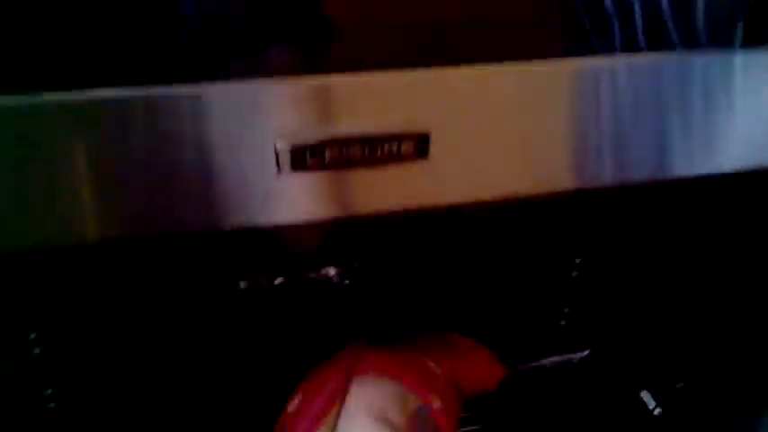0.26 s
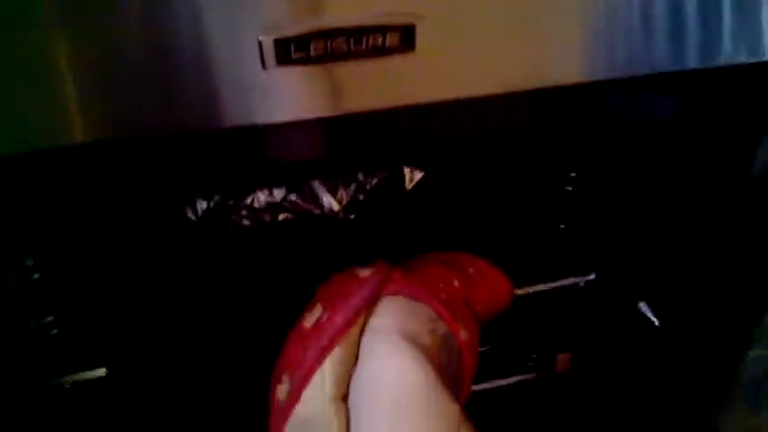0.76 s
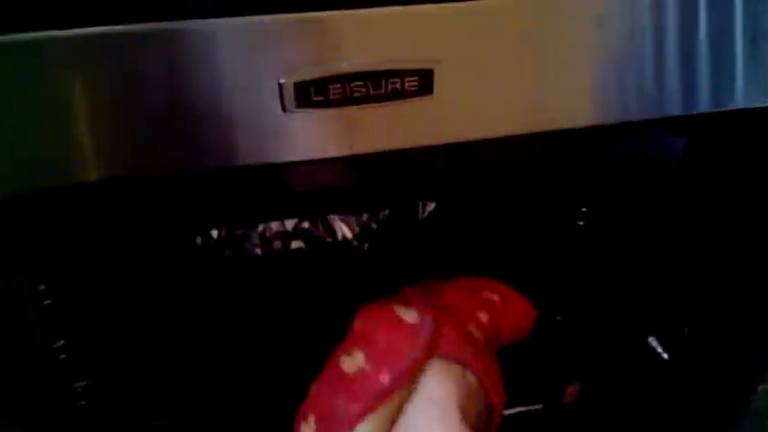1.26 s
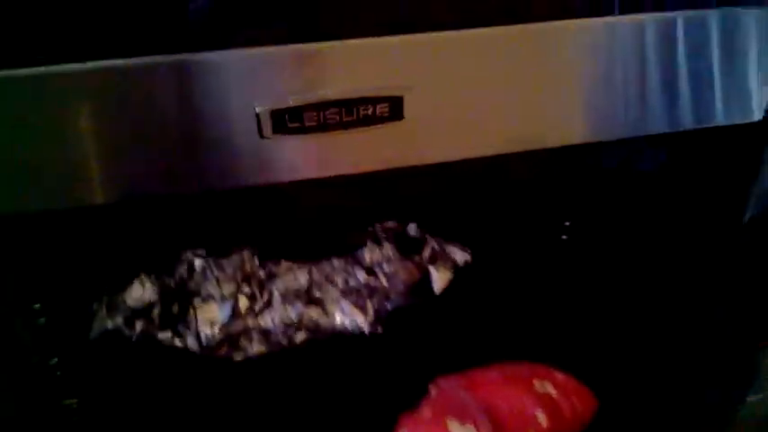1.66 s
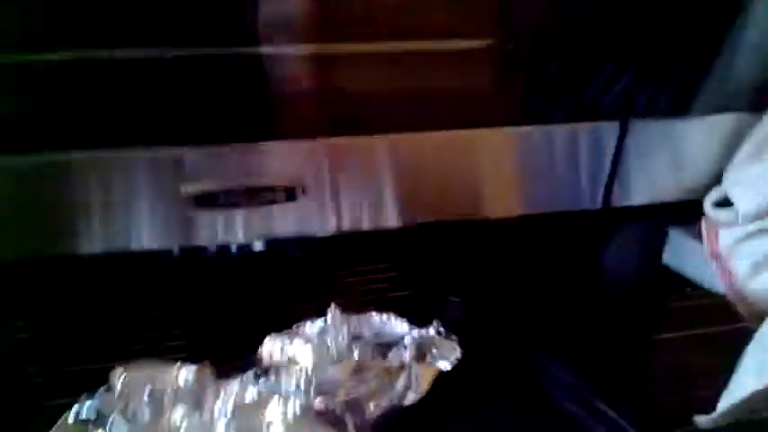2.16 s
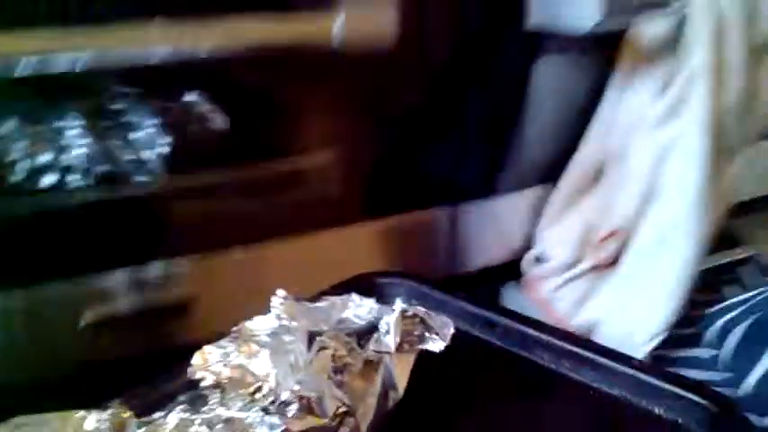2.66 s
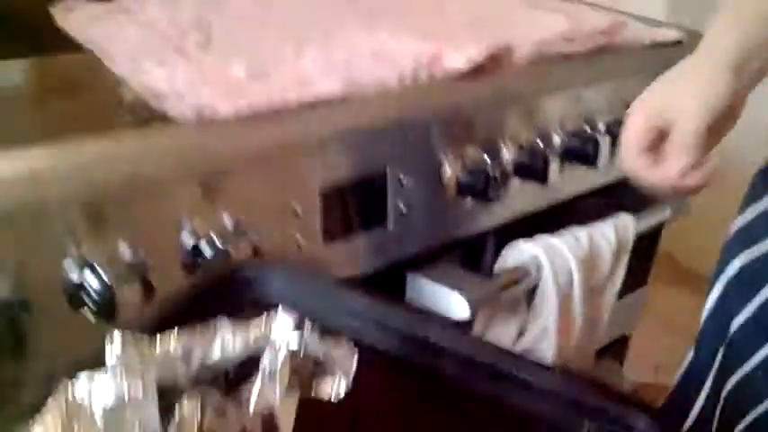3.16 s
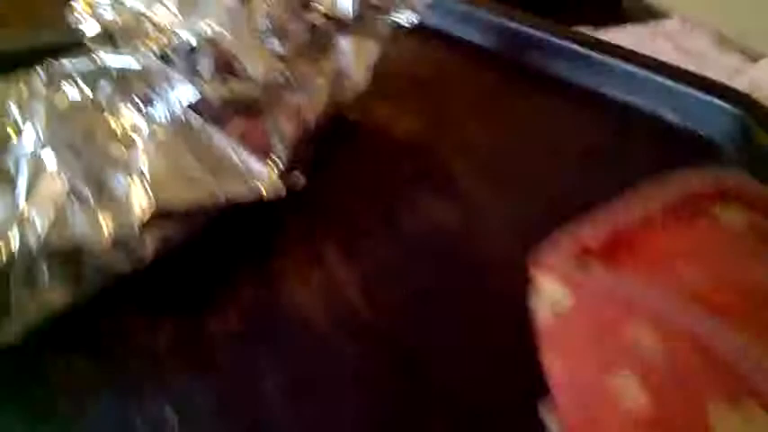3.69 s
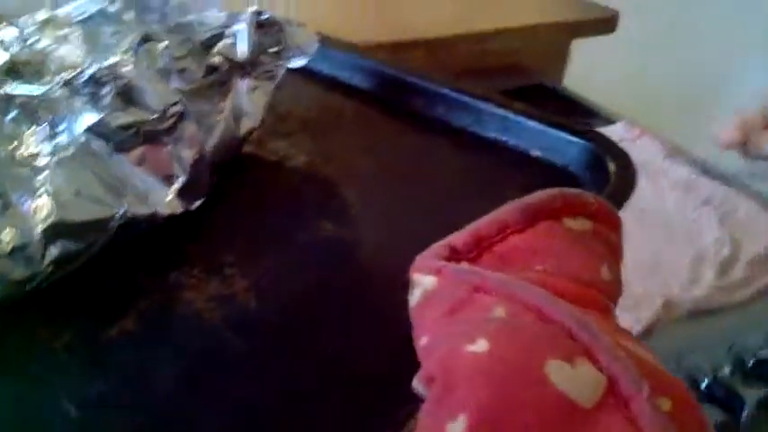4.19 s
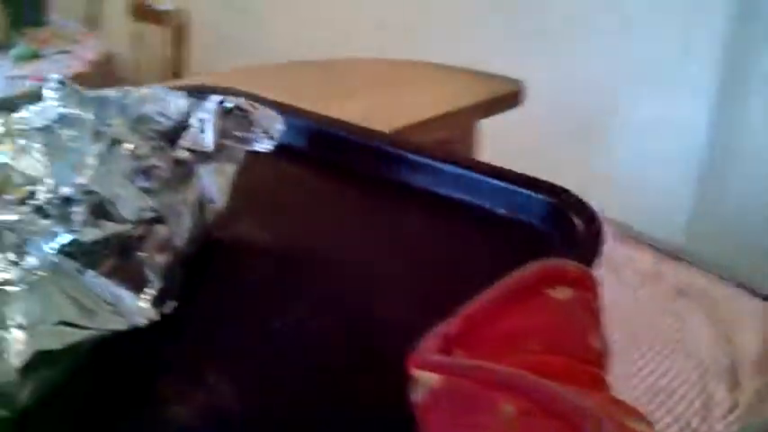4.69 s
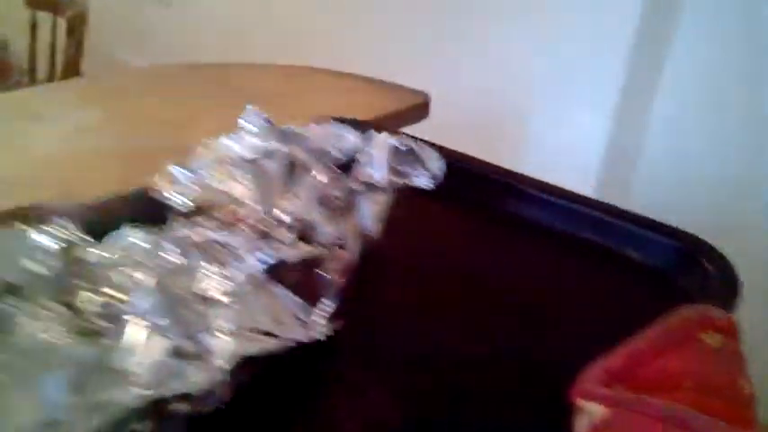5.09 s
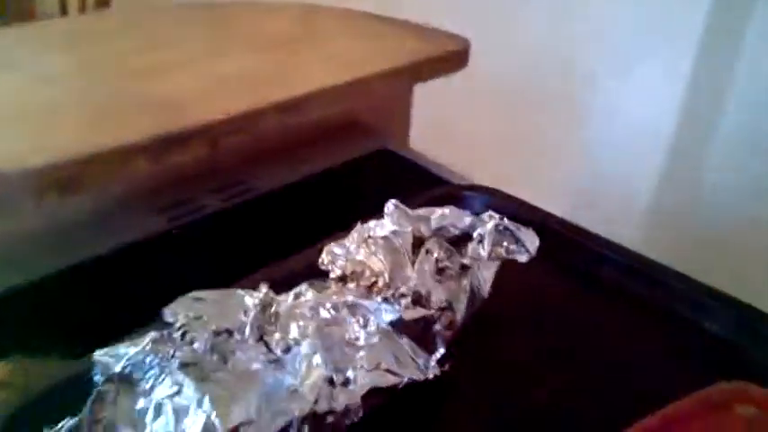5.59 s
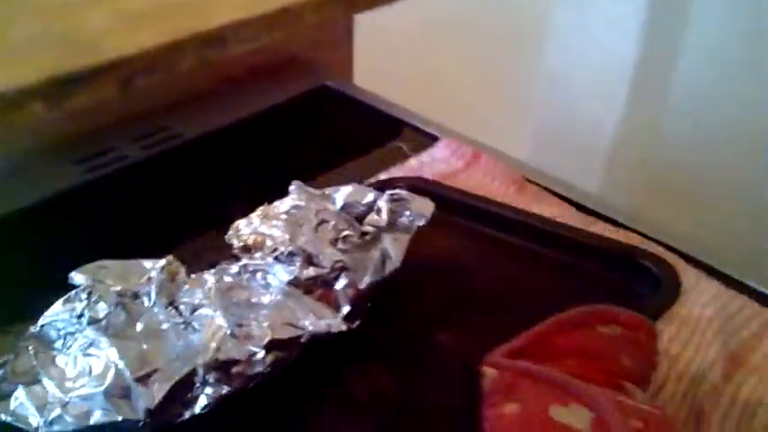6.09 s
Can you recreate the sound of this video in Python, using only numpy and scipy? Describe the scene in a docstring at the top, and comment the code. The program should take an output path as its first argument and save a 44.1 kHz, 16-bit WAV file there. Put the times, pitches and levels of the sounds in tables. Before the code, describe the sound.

A tray grates and knocks against oven metal, growing from light touches to a cluster of hard, ringing clanks with a hollow, boomy body. Crumpled foil then crackles faintly as the tray is carried, with damped knocks and crisp clicks. A heavy oven door bangs shut with a quick bouncing rattle, the loudest event. Quiet brushes and handling bumps remain. Dry, close phone microphone with low grip rumble and steady hiss.

```python
"""In a kitchen, a gloved hand drags a steel baking tray with crumpled foil off an oven rack: knocks, jerky scrapes.
Off the rack the tray's clear ringing is damped; foil rustles as it is carried, and a panel booms when shaken.
Knobs click, the oven door slams and bounces, and finger bumps follow; steady air, hiss and grip rumble lie beneath.
Blows and rubs are noise grains coloured in bands and fed to steel modes; clicks and singing steel are sines.
One channel, a phone held in the hand: no distance or room reverberation is added, only short echoes on the clicks,
soft overload and a band limit."""
import sys
import numpy as np
from scipy import signal
from scipy.fft import rfft, irfft, next_fast_len
from scipy.io import wavfile
from scipy.ndimage import uniform_filter1d

SR = 44100
rng = np.random.default_rng(int(sys.argv[2]) if len(sys.argv) > 2 else 0)


def to_wav(s):
    """Save 16-bit WAV."""
    ch = np.atleast_2d(s).T  # columns
    pcm = np.round(np.clip(ch, -1, 1) * 32767)  # PCM
    wavfile.write(sys.argv[1], SR, pcm.astype(np.int16))


N = 279933  # length in samples

# Levels in the tables stand before the mix gains and the overload.
# Room air and microphone hiss. Each row: frequency in Hz, relative spectral level in dB.
ROOM_TONE = [(15, -39), (28, -34), (60, -13), (110, -6), (250, -12.5), (400, -8.5), (700, -18), (1100, -17),
             (1700, -12.5), (2250, -17.5), (2950, -17), (4000, -23), (6200, -19.5), (7500, -27),
             (16000, -32)]
ROOM_DB = -57.5  # rms, before its slight swell
# The hand shifts on the phone. Each row: start in seconds, rise in seconds, length in seconds,
# level in dB, fade in dB, upper rumble against the deep one in dB.
GRIP_SHIFTS = [(.2, 0.27, 0.26, -62, -8, 15), (.5, .15, 0.35, -66, -11, 10),
               (1.025, 0.055, .19, -55, 0, 14), (1.25, 0.32, 0.4, -59, -8, 15),
               (1.55, .34, 0.47, -62, -12, -9), (2.2, 0.15, 0.27, -64, -9, -11),
               (2.4, .2, 0.42, -59, -14, -20), (3.36, .1, 0.2, -42.5, -35, -18),
               (3.62, .02, .14, -62, -20, -15), (3.777, .04, 0.22, -53, -15, 6),
               (4.1, 0.14, 0.3, -53.5, -11, -8), (4.325, 0.237, .31, -42, -23, -4),
               (4.685, .03, 0.2, -30.5, -5.5, -4.5), (4.924, 0.042, 0.24, -36.5, -28, -3),
               (5.175, 0.11, .32, -39, -28, -19), (5.525, 0.3, 0.3, -45, -12, -19)]
GRIP_REST_DB = -72.5  # the hand is never quite still
# Finger bumps on the phone. Each row: start in seconds, peak in dB before a small trim, time scale in seconds.
FINGER_BUMPS = [(5.267, -35, 0.04), (5.631, -45, 0.012), (5.698, -41, 0.0097), (5.739, -37, 0.02),
                (5.806, -38, 0.0095)]
# Small sprung clicks, as of a knob. Each row: start in seconds, peak in dB, pitch in Hz, number of cycles.
KNOB_CLICKS = [(1.6295, -18.5, 2870, 7.6), (1.698, -17, 3040, 4.6), (2.1247, -29.5, 5400, 7.3),
               (3.3957, -25, 3020, 6.6), (3.398, -19, 3100, 4.8), (3.484, -10.5, 3300, 7.2),
               (3.49, -41, 3060, 3.3), (3.548, -25, 3280, 4.7), (3.568, -37, 4800, 4),
               (3.7848, -31.5, 3320, 9.7), (4.101, -36.5, 3100, 4.6), (4.117, -45, 3310, 5.0),
               (4.136, -41, 2990, 4.4), (4.365, -23, 3600, 1.6), (4.3704, -29, 3300, 5.2),
               (4.3831, -9, 3200, 3.8), (4.441, -19, 3500, 3.4), (5.302, -29.5, 3300, 4.1)]
# A small stiff metal part rings briefly around some of the clicks. Each row: start in seconds, rise in seconds,
# length in seconds, level in dB, fade in dB.
JINGLE_MOVES = [(1.626, .003, .03, -32.5, -12), (3.39, .004, 0.026, -32, -14),
                (3.527, .01, 0.034, -48.5, -3), (4.382, .002, 0.091, -28.5, -22)]
# Its modes. Each row: frequency in Hz, relative level in dB, waver in Hz.
JINGLE_PITCHES = [(2960, 3, 44), (3070, 1, 29.2), (3335, -3, 52), (3580, -3, 58.7), (4470, -8, 59)]
# A large steel panel booms when shaken. Each row: start in seconds, rise in seconds, length in seconds,
# level in dB, fade in dB, pitch in Hz.
PANEL_BOOMS = [(.25, 0.1, .19, -33.5, -12, 102), (0.462, 0.082, 0.35, -46.5, -9, 100),
               (0.842, 0.035, .1, -48, -10, 76), (.97, 0.034, 0.06, -32, -5, 80.7),
               (1.035, 0.023, 0.066, -22.5, -15, 91.4), (1.093, 0.045, 0.19, -30.5, -2.5, 105),
               (1.296, 0.04, 0.086, -30, -15, 107), (1.42, 0.1, 0.21, -31, -20, 112),
               (1.686, 0.063, 0.28, -33, -8, 100), (2.014, 0.17, 0.31, -47.5, -13, 102.5),
               (2.428, .012, 0.067, -49, -2, 265), (2.502, 0.071, 0.15, -37, -26, 103.5),
               (2.68, .08, .2, -53.5, -13, 103), (2.9, .09, .27, -54, -16, 101),
               (3.772, 0.071, 0.23, -40, -24, 78), (4.365, 0.033, 0.27, -36.5, -18, 132),
               (5.163, 0.033, 0.61, -48, -15.5, 109), (5.82, .13, 0.28, -60, -11, 108)]
# The oven hollow. Each row: frequency in Hz, relative level in dB, waver in Hz.
HOLLOW_PITCHES = [(482, 0.5, 14.4), (510.5, 2.5, 15), (531.4, -0.5, 11.3)]
# Thin steel sings, first under the tray, later after jolts. Each row: start in seconds,
# rise in seconds, length in seconds, level in dB, fade in dB.
THIN_STEEL_MOVES = [(0.0, 0.0035, 0.066, -42.5, -23), (.162, 0.0091, 0.089, -45, 1),
                    (0.296, 0.019, 0.054, -25, -37), (.42, 0.038, 0.061, -45, -23),
                    (.52, 0.054, .21, -48, -16), (3.56, 0.0078, 0.11, -55, 2), (3.84, .005, 0.11, -57.5, 5)]
# Its modes. Each row: frequency in Hz, relative level in dB, waver in Hz.
THIN_STEEL_PITCHES = [(1527, 0, 31), (1620, -1, 25.8), (1630, 4.5, 24), (1710, -14, 78)]
# Fine grit of bare metal on metal. Each row: start in seconds, rise in seconds, length in seconds,
# level in dB, fade in dB.
GRIT_MOVES = [(.94, .06, .1, -57, -14), (1.036, .028, 0.13, -47, -39), (1.395, 0.12, 0.22, -53, -25),
              (2.46, .07, 0.18, -68, -5), (3.37, .042, .14, -68, -8), (4.36, .042, .13, -60, -19)]
# The foil rustles faintly while carried. Each row: time in seconds, level in dB.
FOIL_RUSTLE = [(1.899, -78), (2.2, -58.5), (2.65, -51), (2.85, -53), (3.12, -53.5), (3.2, -57.5),
               (3.75, -61), (4.0, -55), (4.1, -61), (4.26, -64), (5.35, -65), (5.45, -68), (5.55, -64),
               (5.7, -64.5), (5.92, -63.5), (6.12, -64), (6.35, -66)]
RUSTLE_TREBLE_DB, RUSTLE_BODY_DB = -2, -10.5  # treble per octave above 1500 Hz, body per octave below 900 Hz
# Off the rack, tray and foil shift and brush; at 4.708 s the door slam rattles loose steel.
# Each row: start in seconds, rise in seconds, length in seconds, level in dB, fade in dB,
# treble lean in dB per octave, body lean in dB per octave
# (the body value also sets, in dB, how strongly the tray modes are stirred).
SHUFFLES_AND_RATTLE = [(1.978, .006, 0.16, -47, -13.5, -5.5, -3), (2.123, 0.015, 0.077, -49, -6, -2, -12),
                       (2.32, 0.096, 0.15, -40, -2.5, -5.5, -13), (2.48, 0.036, 0.15, -39.5, -10.5, 0.5, 1),
                       (2.688, 0.11, 0.094, -46, -8, -11, -8), (3.209, 0.079, 0.18, -50, -9, 3, -2),
                       (3.373, 0.02, .025, -43.5, -5, 9, -19), (3.392, 0.011, 0.16, -35, -5, -4.5, -7.5),
                       (3.58, 0.071, 0.088, -51, -8, -2, 4.5), (3.789, 0.017, 0.17, -40.5, -17, -10, 4.5),
                       (4.283, 0.02, 0.15, -54.5, -9, 2, 2), (4.37, 0.034, .25, -41.5, -16, 2, 7),
                       (4.652, 0.0084, 0.042, -51, -10, 1, -24),
                       (4.708, 0.039, 0.31, -15.5, -25, -4.5, -4.5),
                       (5.033, 0.028, 0.14, -45, 2, -3.5, 1.5), (5.187, 0.041, 0.12, -48, -1.5, 1, 8),
                       (5.31, 0.011, 0.21, -45, -12, -6, 0)]
# The tray slides on the rack in jerks. Each row: as for the shuffles, then level of the oven hollow
# against the scrape in dB.
RACK_SCRAPES = [(0.0, 0.0024, 0.11, -48.5, -7, -7, -15, -28), (0.138, 0.029, 0.082, -52.5, 3, -6.5, 2, 3),
                (0.231, 0.027, 0.064, -32.5, -5.5, -14.5, 0, 2),
                (0.301, 0.0092, 0.12, -28, -15.5, -8, 3, -0.5),
                (0.416, 0.0084, 0.15, -43, -10.5, -5.5, 6, 3), (0.561, 0.063, .15, -45.5, -8, -9.5, -1, -6),
                (0.832, .01, 0.1, -53.5, 5.5, -5, 0, -6), (0.924, 0.072, 0.11, -29.5, -3, -5.5, -11, -7),
                (1.038, 0.012, 0.04, -16, -7.5, -7, -4, -14.5),
                (1.081, 0.0049, 0.21, -27.5, -9, -10, 1, -9.5),
                (1.302, 0.023, 0.062, -29, -1, -7.5, -9, -5), (1.38, .01, 0.034, -35, 10, -5.5, 2, 1.5),
                (1.394, 0.076, .11, -25, -4, -6, -3, -6.5),
                (1.498, .011, 0.13, -26.5, -13.5, -2.5, -3, -3.5),
                (1.62, .004, 0.076, -30, -7, -6, -0.5, -24),
                (1.69, 0.0027, 0.036, -29.5, -2.5, -5.5, -8, -4.5),
                (1.71, 0.05, 0.21, -35, -17, -4.5, 0, -8.5)]
# Colour of the rubbing. Each row: frequency in Hz, relative spectral level in dB.
FRICTION_TONE = [(60, -16), (150, -13.5), (400, -1.5), (700, -3), (1050, -4.5), (1550, 3), (1900, -1),
                 (2250, -6.5), (3000, -1.5), (3800, -6), (5300, -6), (6500, -14), (7500, -23.5),
                 (12000, -61)]
# The door hits its frame and bounces. Each row: start in seconds, peak in dB, treble lean in dB per octave,
# bass lean in dB per octave (both before a common offset), t60 in seconds before the band factor,
# rise in seconds before bass slowing, drive of the clear modes in dB, crack share as an amplitude factor.
DOOR_BLOWS = [(4.697, -5.5, -7.5, -27, 0.088, 0.0044, -16, 0.38),
              (4.709, -14.5, 2.5, -9.5, 0.93, 0.0012, -14, 0.3),
              (4.723, -12.5, 0, -9.5, 0.37, 0.0027, -4.5, 0.3),
              (4.756, -12.5, -14, -10, 0.47, 0.003, -11, 0.3), (4.809, -22, -3, -7, 0.39, 0.0031, -15, 0.3),
              (4.917, -35, -23, -14, 0.74, 0.003, -31, 0.3)]
# Dense ringing of the door. Each row: frequency in Hz, relative spectral level in dB.
DOOR_WASH = [(18, -38), (30, -53), (75, 0.5), (106, 1), (210, -5), (295, -2), (721, -13.5), (822, -15),
             (889, -14), (3060, -11.5), (5740, -18.5), (8080, -28.5), (9710, -26), (16000, -46)]
# Clear modes of the door. Each row: frequency in Hz, gain in dB, t60 in seconds.
DOOR_MODES = [(298.4, 6.5, 0.24), (666, -20, 0.9), (766, -1, 0.43), (863, -5, 0.52), (1020, -20, 0.35),
              (1244, 1, 0.25), (1480, -21, 0.46), (1525, -32, 0.64), (2100, -12, 0.39)]
# The tray knocks against rack and hob. Each row: the columns of the door blows.
TRAY_KNOCKS = [(0.0, -26.5, -25, -31, 0.086, 0.0013, -15, 0.3),
               (0.166, -36.5, -14, 0.5, 0.36, 0.0037, 2.5, 0.88),
               (0.238, -26, -44, -14, 0.27, 0.003, 3, 0.12), (0.309, -24, -14, -6, 0.61, 0.0013, -3, 0.65),
               (0.621, -37, -5.5, -4.5, 0.31, 0.003, -18, 0.6),
               (0.843, -39, -13, -2, 0.67, 0.0075, 2.5, 0.69),
               (0.975, -21, -3, -5, 0.31, 0.0058, 2.5, 0.67), (1.046, -15.5, 2.5, -9, 0.57, 0.0025, 8, 0.5),
               (1.313, -18.5, -11, -9.5, 0.3, 0.0013, -14, 0.54),
               (1.398, -12.5, -28, -12, 0.31, 0.0028, -5, 0.28),
               (1.436, -13, -22, -19, 0.33, 0.0046, -14, 0.23),
               (1.506, -10, -46, -18, 0.47, 0.0014, -14, 0.22),
               (1.63, -22.5, -27, -14.5, 1, 0.0048, -25, 0.44),
               (1.697, -21.5, -20, -13, 0.62, 0.0011, -10, 0.99),
               (1.974, -32, -37, -14, 0.3, 0.0023, 0, 0.37), (2.124, -61, 10, -7, 0.15, 0.002, 2, 0.56),
               (2.325, -38, 0.5, -25, 0.67, 0.005, 6, 1), (2.429, -28, -31, -14.5, 0.24, 0.0083, -8, 0.46),
               (2.502, -33.5, 6, -13.5, 0.26, 0.0052, -14, 0.37),
               (2.896, -41, -4, -38, 0.89, 0.0031, -12, 0.67),
               (3.046, -38, 0.5, -21, 0.32, 0.0033, 5, 0.63), (3.397, -20, -3, -23, 0.31, 0.0049, -5, 0.82),
               (3.438, -21, -7, -19.5, 0.24, 0.0026, -12, 0.95),
               (3.785, -25, -18, -12.5, 0.38, 0.0048, -2, 1),
               (4.292, -53, 10, -20, 0.25, 0.0036, -5.0, 0.54),
               (4.384, -38.5, 11, 2, 0.28, 0.0014, -5.0, 0.56),
               (4.659, -53.5, 9, -14, 0.19, 0.0025, -5.0, 0.7),
               (5.299, -31, -35, -6, 0.29, 0.001, -8, 0.32)]
# Dense ringing of the sheet. Each row: frequency in Hz, relative spectral level in dB.
TRAY_WASH = [(76, -1), (130, 3), (172, 6.5), (224, 0), (268, 4.5), (335, -9.5), (501, -2), (651, -11.5),
             (1580, -7), (2180, -8), (2950, -8), (4410, -21), (5180, -16.5), (16000, -60)]
# Clear modes of the tray. Each row: frequency in Hz, gain in dB, t60 in seconds.
TRAY_MODES = [(171.6, -4, 0.34), (272, -11, 0.46), (406, -7.5, .3), (585, -22, 0.42), (960, -2.5, 0.12),
              (1146, -5, 0.11), (1223, -10, 0.39), (1480, -43, 0.13), (1514, -26, 0.23), (1630, -3.5, 0.2),
              (1774, -13.5, 0.39), (2670, -31, 0.18), (3210, -26, 0.18)]
LIFTED_S, MUFFLE_DB = 1.95, -16.5  # off the rack, the glove damps the clear modes
# How long the dense ringing lasts across the bands. Each row: frequency in Hz, factor on t60.
BAND_SUSTAIN = [(60, 1.42), (300, 1.29), (1200, 1.027), (3000, 0.67), (7000, 0.49), (14000, 0.55)]
BANDS = np.geomspace(45, 14000, 10)  # band centres in Hz
RELEASE_S = 0.019  # time constant of every swell's end
CEILING = 0.83  # the input stage bends over toward this amplitude
EDGE_HZ = 15750  # upper band limit of the phone


def gain_of(db):
    """Decibels to amplitude."""
    return 10 ** (np.asarray(db) / 20)


def evened(x):
    """Scales to rms 1."""
    return x / np.sqrt(np.mean(x ** 2) + 1e-20)


def read(points, hz):
    """Reads a table on a log-frequency axis."""
    f, value = np.transpose(points)
    return np.interp(np.log(hz + 1), np.log(f + 1), value)


def add(mix, s, sound):
    """Mixes a sound in at time s, cut at the end of the mix."""
    part = mix[..., max(round(s * SR), 0):][..., :sound.shape[-1]]
    part += sound[..., :part.shape[-1]]


def swell(start, rise, length, db, fade_db, curve=1.5):
    """One movement in time: a curved rise, a steady fade up to its length, a quick release."""
    t = np.arange(N) / SR - start
    rise = np.clip(rise, .001, length - .001)
    fading = gain_of(db + fade_db * np.clip((t - rise) / (length - rise), 0, 1))
    release = np.exp(-np.clip(t - length, 0, 1) / RELEASE_S)
    return np.clip(t / rise, 0, 1) ** curve * fading * release


def joined(levels):
    """Levels of overlapping movements add as powers."""
    return np.sqrt(sum(level ** 2 for level in levels))


def split(x, tone):
    """Colours x and cuts it into overlapping bands; the middle bands together have rms 1."""
    size = next_fast_len(N)
    hz = np.fft.rfftfreq(size, 1 / SR)
    shares = np.array([np.interp(np.log(hz + 1), np.log(BANDS), row) for row in np.eye(len(BANDS))])
    coloured = rfft(x, size) * gain_of(read(tone, hz))
    bands = irfft(coloured * shares, size)[:, :N]
    middle = bands[(BANDS > 700) & (BANDS < 2400)].sum(0)
    return bands / np.sqrt(np.mean(middle ** 2))


def tilt(treble_db, bass_db):
    """Gain of each band: treble and bass lean per octave around the middle, up to a limit."""
    up = np.clip(np.log2(BANDS / 1500), 0, 1.35)[:, None]
    down = np.clip(np.log2(900 / BANDS), 0, 1.3)[:, None]
    return gain_of(up * treble_db + down * bass_db)


def grains(per_s, spread_db, smooth):
    """Irregular stick-slip clicks of scattered size over a smooth share of noise."""
    size = gain_of(spread_db * np.minimum(rng.exponential(1, N), 4))
    slips = size * (rng.random(N) < per_s / SR)
    return evened(evened(slips * rng.standard_normal(N)) + smooth * rng.standard_normal(N))


def patchy(x, patchy_db, frames, bins):
    """Close-packed sheet modes come and go: random patches of gain, shallower in the treble where modes overlap."""
    hz, _, z = signal.stft(x, SR, nperseg=2048, noverlap=1536)
    field = uniform_filter1d(rng.standard_normal(z.T.shape), frames, 0)
    field = uniform_filter1d(field, bins, 1).T
    depth_db = patchy_db / np.sqrt(1 + hz[:, None] / 2500)
    return signal.istft(z * gain_of(depth_db * evened(field)), nperseg=2048, noverlap=1536)[1][:N]


def singing(modes):
    """Close modes beat against each other while their phases wander."""
    t = np.arange(N) / SR
    wander = np.cumsum(uniform_filter1d(rng.standard_normal((len(modes), N)), 300), 1)
    out = np.zeros(N)
    for (hz, db, waver), walk in zip(modes, wander):
        phase = 2 * np.pi * hz * t + np.sqrt(2 * np.pi * waver / SR) * walk
        out += gain_of(db) * np.sin(phase)
    return out


def ring(drive, modes):
    """A force passes each mode of the steel, a two-pole resonator."""
    out = np.zeros(N)
    for hz, db, t60 in modes:
        r, w = 1000 ** (-1 / (t60 * SR)), 2 * np.pi * hz / SR
        out += gain_of(db) * signal.lfilter([np.sin(w)], [1, -2 * r * np.cos(w), r * r], drive)
    return out


def struck(blows, tone, rings, modes_db, treble_db, bass_db, chatter_s):
    """Each blow cracks, sets off a dense wash that dies band by band, and chatters on the clear modes."""
    power, force, t = np.zeros((len(BANDS), N)), np.zeros(N), np.arange(SR) / SR
    centres = BANDS[:, None]
    crack_colour = np.exp(-np.log2(centres / 2500) ** 4 / 5.5)
    for s, db, treble, bass, t60, rise, ring_db, crack in blows:
        slow = np.clip(rise, .0003, .05) * (1 + 150 / centres)  # bass builds up later
        decay_s = np.maximum(t60, .02) * read(BAND_SUSTAIN, BANDS)[:, None]
        fall = gain_of(db - 60 * t / decay_s) * (1 - np.exp(-t / slow))
        leaning = fall * tilt(treble - treble_db, bass - bass_db)
        # the first contact
        snap = gain_of(db) * crack * np.exp(-t / 0.006) * (1 - np.exp(-t / 0.0011)) * crack_colour
        add(power, s - .001, leaning ** 2 + (1.44 * snap) ** 2)
        add(force, s, gain_of(db + ring_db) * np.exp(-t[:6000] / chatter_s))
    texture = patchy(grains(2500, 0.52, 1.85), 3.0, 3, 3)
    wash = (split(texture, tone) * np.sqrt(power)).sum(0)
    return wash + gain_of(modes_db) * rings(force * rng.standard_normal(N))


def room():
    """Steady air of the kitchen and microphone hiss: coloured noise with a slight swell."""
    drift = evened(uniform_filter1d(uniform_filter1d(rng.standard_normal(N), 6000), 6000))
    air = evened(split(rng.standard_normal(N), ROOM_TONE).sum(0))
    return gain_of(ROOM_DB + 0.59 * drift) * air  # drift of 0.59 dB rms


def hand():
    """At the phone itself: low grip rumble in two depths and nearly one-sided pressure bumps."""
    moves = [(swell(*row[:5], curve=1.7), gain_of(row[5])) for row in GRIP_SHIFTS]
    deep = joined(level for level, _ in moves)
    upper = joined(level * share for level, share in moves)
    out = np.zeros(N)
    for band_hz, level in (([18, 45], deep), ([58, 82], upper)):
        low_band = signal.butter(3, band_hz, "band", fs=SR, output="sos")
        rumble = signal.sosfilt(low_band, rng.standard_normal(N))
        out += evened(rumble) * uniform_filter1d(level + gain_of(GRIP_REST_DB), 500)
    for s, db, length in FINGER_BUMPS:
        u = np.arange(8000) / SR / length
        push = u * (2 - u) * np.exp(-u * 3.1)
        add(out, s, gain_of(db) * 0.91 * push / push.max())
    return out


def boom():
    """The panel gives a wavering low tone, roughened by the shaking that feeds it."""
    out, t = np.zeros(N), np.arange(N) / SR
    shake = evened(uniform_filter1d(uniform_filter1d(rng.standard_normal((2, N)), 700), 700))
    waver = 1 + 0.38 * (shake[0] + 1j * shake[1])  # in amplitude and phase
    for *move, hz in PANEL_BOOMS:
        out += (waver * np.exp(2j * np.pi * hz * t)).real * swell(*move, curve=1.7)
    return out


def clicks():
    """A few cycles that swell and stop short, with a faint overtone and a few echoes."""
    out = np.zeros(N)
    for s, db, hz, cycles in KNOB_CLICKS:
        u = np.arange(0, 1, hz / max(cycles, 1) / SR)
        tone = np.sin(2 * np.pi * cycles * u) + 0.07 * np.sin(4.2 * np.pi * cycles * u)
        ping = np.sin(np.pi * u ** 2.6) * tone
        add(out, s, gain_of(db) * ping)
        # nearby steel throws it back: delay in seconds, loss in dB
        for late, loss_db in ((.0018, 13), (.0043, 16), (.0079, 19), (.0131, 25)):
            add(out, s + late, gain_of(db - loss_db) * ping)
    return out


def jingles():
    """Short bright ringing of wandering modes around some of the clicks."""
    return joined(swell(*row, curve=1.2) for row in JINGLE_MOVES) * evened(singing(JINGLE_PITCHES))


def hollow_and_thin_steel():
    """The oven hollow sings with each scrape; thin steel at its own moments, under the tray, later after jolts."""
    hollow = joined(swell(*row[:5], curve=1.0) * gain_of(row[7]) for row in RACK_SCRAPES)
    thin_steel = joined(swell(*row, curve=1.5) for row in THIN_STEEL_MOVES)
    hollow_sound = uniform_filter1d(hollow, 600) * evened(singing(HOLLOW_PITCHES))
    return hollow_sound + thin_steel * evened(singing(THIN_STEEL_PITCHES))


def door_slam():
    """The oven door strikes its frame and bounces, ringing freely on its own modes."""
    return struck(DOOR_BLOWS, DOOR_WASH, lambda force: ring(force, DOOR_MODES), -34, -1.2, -4.5, 0.038)


def grit():
    """Dense tiny slips of metal on metal, heard only in the treble."""
    treble_pass = signal.butter(3, [7200, 11500], "band", fs=SR, output="sos")
    slips = evened(signal.sosfilt(treble_pass, grains(7500, 1.5, 0.71)))
    return joined(swell(*row, curve=2.5) for row in GRIT_MOVES) * slips


def tray_rings(force):
    """The tray sings freely on the rack and less in the glove."""
    lifted = np.arange(N) > LIFTED_S * SR
    return ring(force * gain_of(MUFFLE_DB * lifted), TRAY_MODES)


def rub():
    """Friction and rattle grains, coloured by sheet and foil; they also stir the modes of the tray."""
    s, db = np.transpose(FOIL_RUSTLE)
    moves = [(swell(*row[:5], curve=1.18), *row[5:7]) for row in RACK_SCRAPES + SHUFFLES_AND_RATTLE]
    rustle = gain_of(np.interp(np.arange(N) / SR, s, db, left=-120))
    moves.append((rustle, RUSTLE_TREBLE_DB, RUSTLE_BODY_DB))
    # fine patches, then broader ones
    slips = patchy(patchy(grains(2500, 3.36, 1.18), 3.45, 3, 3), 2.85, 5, 12)
    stirring = joined(level * gain_of(body) for level, _, body in moves)
    stirred = tray_rings(grains(740, 1.2, 0.95) * stirring)
    shape = joined(level * tilt(treble, body) for level, treble, body in moves)
    return (split(slips, FRICTION_TONE) * shape).sum(0) + gain_of(-35) * stirred


def tray_knocks():
    """The tray knocks on rack and hob: cracks, a dense wash of the sheet and its clear modes."""
    return struck(TRAY_KNOCKS, TRAY_WASH, tray_rings, -23.5, -4.5, -3, 0.016)


def scene():
    """Room, hand, clicks, oven, door and tray in one channel."""
    background = room() + hand() + boom() + clicks() + jingles() + hollow_and_thin_steel()
    # mix gains of the door and of the tray knocks
    blows = gain_of(-8.0) * door_slam() + gain_of(-10) * tray_knocks()
    return (background + blows + grit() + rub())[None]


def record(dry):
    """Soft overload, then the band limit of the phone."""
    bent = CEILING * np.tanh(dry / CEILING)
    band_limit = signal.firwin(511, EDGE_HZ, window=("kaiser", 9), fs=SR)
    return signal.oaconvolve(bent, band_limit[None], "same")


dry = scene()
out = record(dry)
to_wav(out)
```